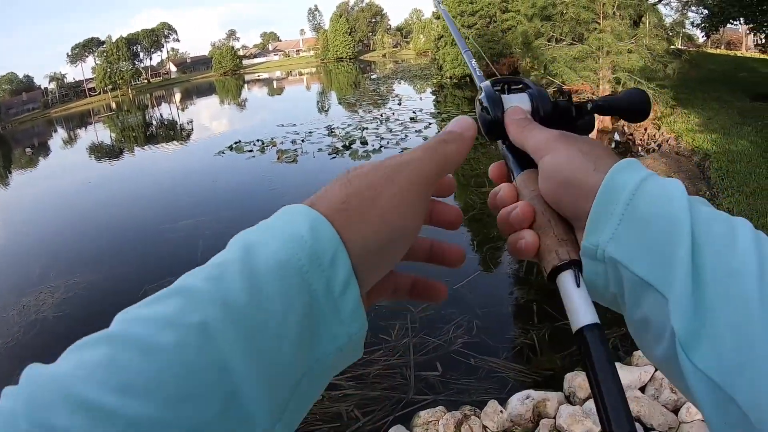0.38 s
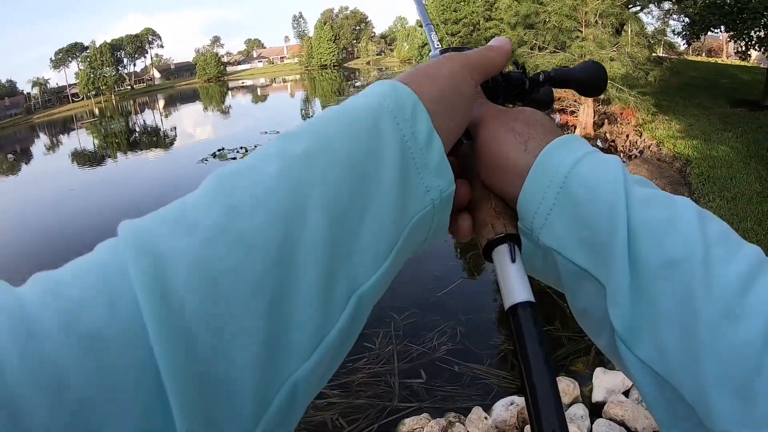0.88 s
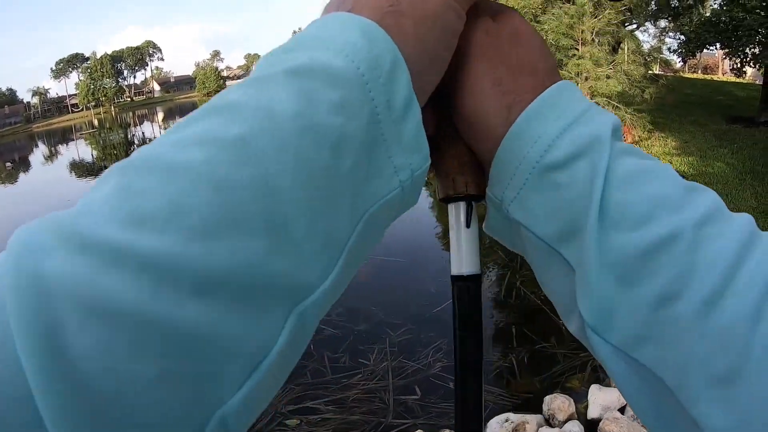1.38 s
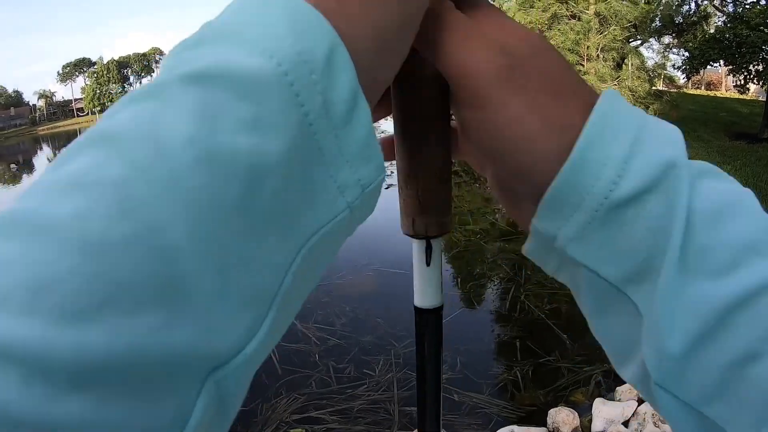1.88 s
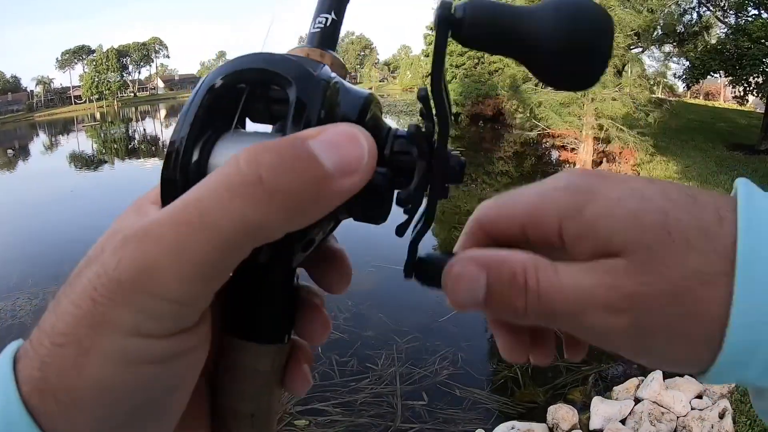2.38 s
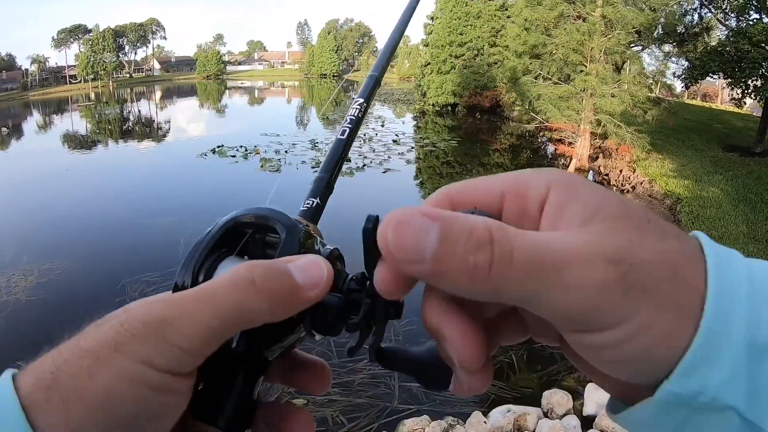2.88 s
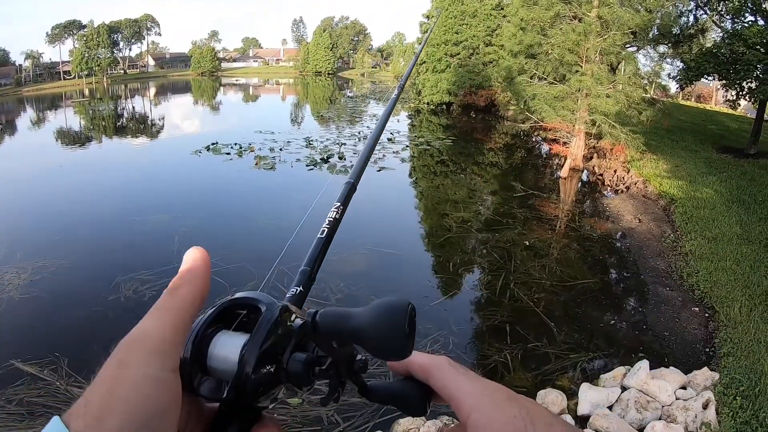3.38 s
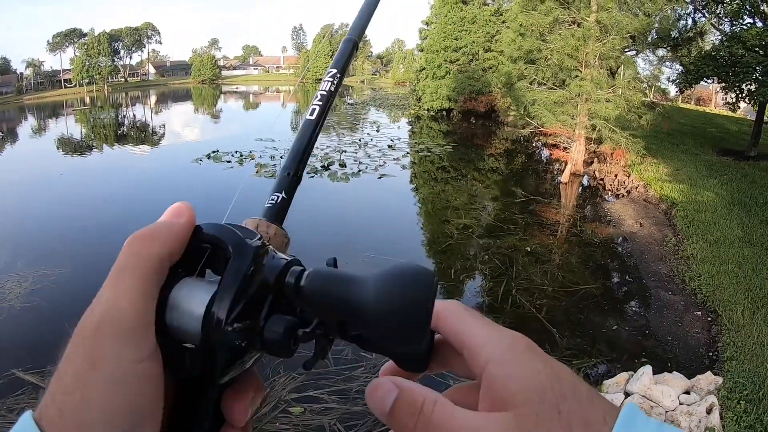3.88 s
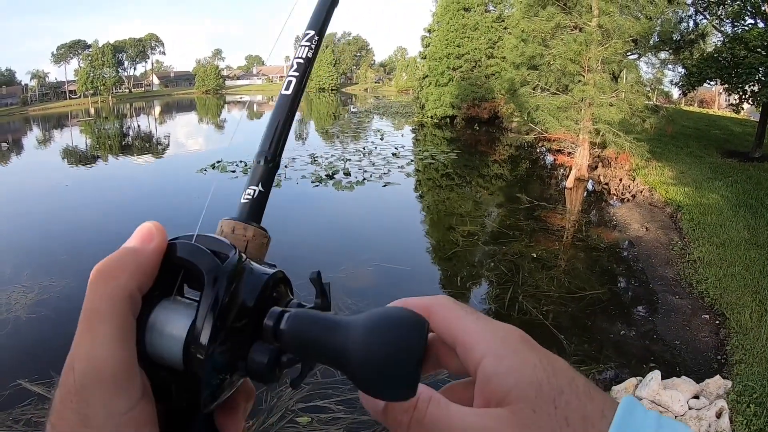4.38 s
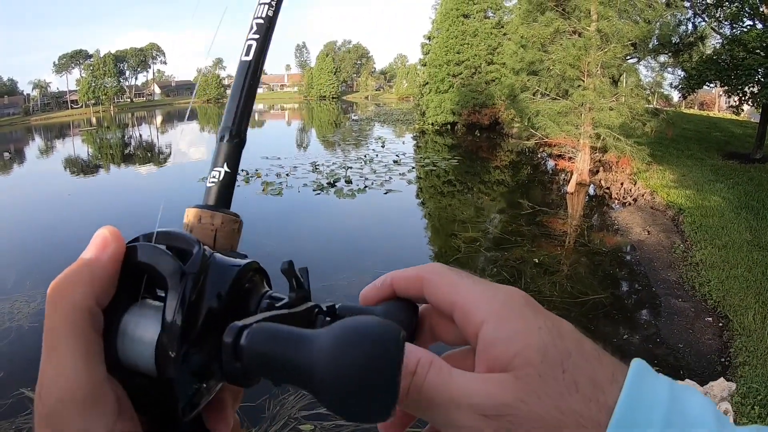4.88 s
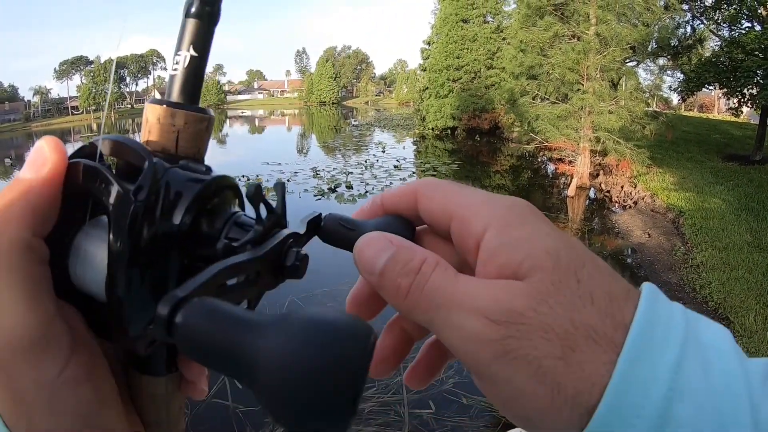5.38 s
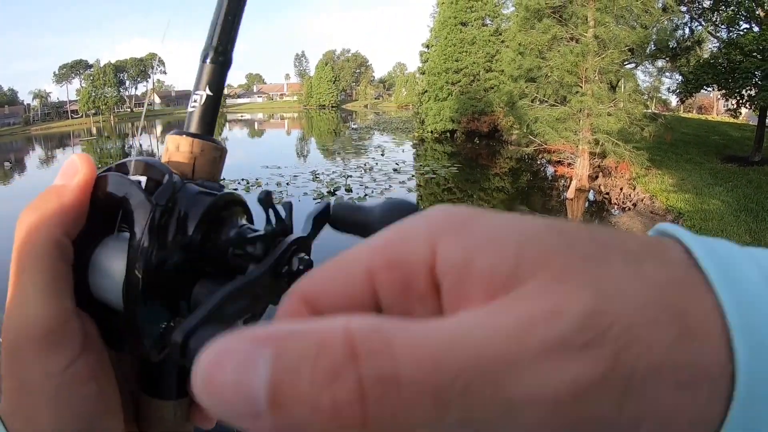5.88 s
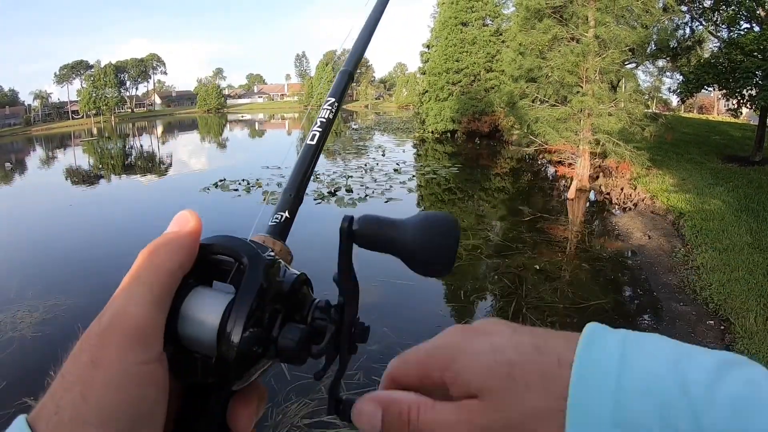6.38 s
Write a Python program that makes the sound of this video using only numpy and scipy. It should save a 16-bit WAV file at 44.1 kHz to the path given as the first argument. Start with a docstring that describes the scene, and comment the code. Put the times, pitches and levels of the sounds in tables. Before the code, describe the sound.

A quiet open-air pond bank, heard through a small stereo camera microphone close to the hands. Throughout, very high crickets chirp in an even pulse, about four a second, growing slightly clearer after 3 seconds, over steady hiss, faint breeze, far traffic and swelling deep rumble. At first reel gears whirr softly, with light ticks at 0.5-0.8 seconds. Hands rustle and rasp more from 1 second, with small ticks at 1.8. At 2.05-2.1 the clutch snaps back: a loud, hard double crack with a brief metallic rattle. A smaller click comes at 2.65, fainter ticks near 2.9 and 3.1. The whirr fades by 4; a faint far whistle sounds around 4.1-4.4. Soft finger touches cluster at 5.1-5.35, with a brief whirr. From 5.75 the gears return faintly, with ticks at 6.0, a tiny squeak at 6.14, more rustling and a last double tick at 6.36.

```python
"""Beside a pond, an angler winds and handles a small geared reel. Far traffic and a deep rumble (shaped noise)
lie under hiss and breeze; crickets, built from sine wing strokes, chirp about four times a second in the grass.
The gears whirr at first (noise in housing resonances), fade away and are heard again. The clutch snaps back;
ticks and soft touches (short noise pushes) ring the reel, hands rustle and rasp, and faint thin tones sound:
a far whistle and, late on, a short squeak (arched sines)."""
import sys
import numpy as np
from scipy import signal
from scipy.fft import rfft, irfft
from scipy.io import wavfile

SR = 44100
rng = np.random.default_rng(int(sys.argv[2]) if len(sys.argv) > 2 else 0)


def boost(x):
    """Linear amplitude factor 10**(x/20) for a level x in decibels (scalar or array-like)."""
    u = np.asarray(x, float) / 20
    return 10 ** u


def put_to_file(sound):
    """Save the sound as 16-bit audio at rate SR, in the file named by the first command-line argument."""
    columns = np.atleast_2d(sound).T  # one column per channel
    safe = np.clip(columns, -1, 1)
    whole_steps = np.round(safe * 32767)
    wavfile.write(sys.argv[1], SR, whole_steps.astype(np.int16))


N = 286694   # length in samples, 6.5 s


def rms_one(x):
    """Scale to rms 1."""
    return x / np.sqrt(np.mean(x ** 2) + 1e-20)


def at_hz(points, hz):
    """Read a spectrum on a log-frequency axis."""
    points = np.array(points)
    return np.interp(np.log(hz), np.log(points[:, 0]), points[:, 1])


def curve(rows):
    """Read a level curve at every sample."""
    return np.interp(np.arange(N) / SR, *np.transpose(rows))


def drift(rate_hz):
    """Slow random wander of rms about 1: noise through two equal one-pole low-passes at rate_hz."""
    step = 40   # worked out at every 40th sample, then joined by straight lines
    r = np.exp(-2 * np.pi * rate_hz * step / SR)
    slow = signal.lfilter([1], [1, -2 * r, r * r], rng.standard_normal(N // step + 2002))
    slow = rms_one(slow[2000:])   # leave out the filter's start
    return np.interp(np.arange(N) / step, np.arange(len(slow)), slow)


def ring(x, hz, t60_s):
    """Two-pole resonator: a unit click sets a sine of starting height 1 ringing, 60 dB down after t60_s."""
    r = boost(-60 / (t60_s * SR))
    w = 2 * np.pi * hz / SR
    return signal.lfilter([0, np.sin(w)], [1, -2 * r * np.cos(w), r * r], x + 1e-18)


def band(x, low_hz, high_hz):
    """Butterworth band-pass, 12 dB per octave on each side."""
    edges = [low_hz, min(high_hz, .45 * SR)]
    return signal.sosfilt(signal.butter(2, edges, "band", fs=SR, output="sos"), x)


def high_pass(x, order, hz):
    """Butterworth high-pass."""
    return signal.sosfilt(signal.butter(order, hz, "high", fs=SR, output="sos"), x)


def sides(x, pan_db):
    """Place a mono sound in stereo; pan_db is left minus right."""
    return x * boost(np.multiply.outer([.5, -.5], pan_db * np.ones(N)))


# Likeness of left and right in diffuse sound: f/Hz, correlation [-1 to 1]
LEFT_RIGHT_LIKENESS = [(40, .75), (70, .9), (130, .9), (290, .89), (640, .23), (1410, -.15), (3100, .27),
                       (6820, .22), (15000, -.2)]


def field(spectrum, patchy_db, rate_hz):
    """Diffuse stereo noise: coloured, alike in both ears by frequency, flickering per octave; mid rms 1."""
    hz = np.maximum(np.fft.rfftfreq(N, 1 / SR), 1)
    mid, side = rfft(rng.standard_normal((2, N))) * boost(at_hz(spectrum, hz))
    alike = np.clip(at_hz(LEFT_RIGHT_LIKENESS, hz), -.99, .99)
    ears = np.sqrt(1 + alike) * mid + np.sqrt(1 - alike) * side * [[1], [-1]]
    octave = np.log2(hz / spectrum[0][0])
    octaves = int(np.log2(spectrum[-1][0] / spectrum[0][0])) + 2
    out = 0
    for k in range(octaves):
        share = np.cos(np.pi / 2 * np.clip(octave - k, -1, 1)) ** 2   # neighbouring octaves crossfade
        out = out + irfft(ears * share, N) * boost(patchy_db * drift(rate_hz))
    return out / np.std(out.mean(axis=0))


# Colour of the deep rumble, shape only: f/Hz, level/dB [per Hz]
RUMBLE_COLOUR = [(40, -24), (62, -4.5), (85, -5.5), (108, -8), (140, -15)]
# Swells of the rumble: t/s, peak level/dB [before the wander], half length/s [down to 1/e]
RUMBLE_SWELLS = [(0, -56.5, 0.075), (0.674, -62, .12), (1.05, -73, 0.083), (1.97, -58, 0.13),
                 (2.264, -54.5, 0.094), (3.3, -61, 0.21), (4.136, -56.5, 0.19), (4.925, -56, 0.14),
                 (5.25, -53.5, 0.23), (5.848, -58.5, 0.21), (6.5, -63, .15)]


def rumble():
    """Deep far rumble: low noise in bell-shaped swells with a random wander in level."""
    t = np.arange(N) / SR
    swell = sum(boost(db) * np.exp(-((t - s) / half_s) ** 2) for s, db, half_s in RUMBLE_SWELLS)
    return swell * boost(3.84 * drift(8.0)) * field(RUMBLE_COLOUR, patchy_db=2.5, rate_hz=2.7)


# Colour of the traffic, shape only: f/Hz, level/dB [per Hz]
TRAFFIC_COLOUR = [(20, -43), (35, -16), (55, -12.5), (110, -4.5), (170, -0.5), (330, -5), (450, -10.5),
                  (800, -19), (1200, -55)]
# Level of the traffic: t/s, level/dB
TRAFFIC_CURVE = [(0, -52.5), (.83, -50.5), (1.4, -52.5), (1.96, -48.5), (2.3, -54.5), (3.5, -54.5),
                 (3.8, -53.5), (5.9, -53.5), (6.08, -50), (6.5, -54)]


def traffic():
    """Far traffic: broad low noise that follows a level curve."""
    return boost(curve(TRAFFIC_CURVE)) * field(TRAFFIC_COLOUR, patchy_db=.62, rate_hz=7.7)


# Colour of the hiss, shape only: f/Hz, level/dB [per Hz]
HISS_COLOUR = [(1500, -13), (2500, -14.5), (4200, -8), (6000, 2), (7600, 2.5), (9600, 1.5), (10400, -3),
               (11300, -16), (14200, -19), (15500, -43), (16300, -48)]
HISS_DB = -61


def hiss():
    """Steady hiss of leaves, far insects and microphone: high noise with a slight flicker."""
    return boost(HISS_DB) * field(HISS_COLOUR, patchy_db=.25, rate_hz=9.0)


# Colour of the breeze, shape only: f/Hz, level/dB [per Hz]
BREEZE_COLOUR = [(800, -43), (1100, 13), (1800, -1), (2600, 0), (4000, 5), (6000, -37)]
# Level of the breeze: t/s, level/dB
BREEZE_CURVE = [(0, -70.5), (.83, -68.5), (1.05, -77), (3.8, -76.5), (4.75, -76.5), (5.3, -74.5),
                (6.5, -69)]


def breeze():
    """Breeze: patchy noise above about 1 kHz that follows a level curve."""
    return boost(curve(BREEZE_CURVE)) * field(BREEZE_COLOUR, patchy_db=3.0, rate_hz=15.0)


# Faint thin tones, one a row: a far whistle, and at 6.14 s a short squeak:
# start t/s, length/s, top f/Hz, level/dB [rms before flicker and panning], fall over the tone/Hz
THIN_TONES = [(4.085, .035, 1165, -68, 0), (4.15, .07, 1765, -70, 0), (4.21, .125, 1750, -75, 0),
              (4.33, .075, 1860, -73, 150), (6.14, .06, 1600, -71, 0)]
TOP_AT = .4     # share of the tone where the level peaks and the arch is highest
ARCH_HZ = 300   # sag per squared share of the tone away from there


def thin_tones():
    """Far whistle and a short squeak: sines that arch in pitch, with soft ends and a small random wobble."""
    out, t = np.zeros(N), np.arange(N) / SR
    for s, length_s, top_hz, db, fall_hz in THIN_TONES:
        along = np.clip((t - s) / length_s, 0, 1)
        rise_or_fall = np.minimum(along / TOP_AT, (1 - along) / (1 - TOP_AT))
        swell = np.sin(np.pi / 2 * rise_or_fall) ** .5
        from_top = along - TOP_AT
        hz = top_hz - ARCH_HZ * from_top ** 2 - fall_hz * from_top + 20 * drift(40)
        out += np.sqrt(2) * boost(db) * swell * np.sin(2 * np.pi * np.cumsum(hz) / SR)
    return sides(out * boost(2 * drift(30.0)), pan_db=-11.0)


# Wing strokes of one chirp: place [strokes from the loudest], level/dB [against the chirp], f offset/Hz
WING_STROKES = [(-4, -12, -200), (-3, -7, -100), (-2, -4, -30), (-1, -2.5, 0), (0, -2, 10), (1, -5.5, 10)]
# Runs of evenly spaced chirps, and stray single chirps of a lower cricket:
# first t/s, last t/s, chirps [count], level/dB [stroke peak], wing f/Hz; all before the scatter below
CHIRPS = [(.165, 2.265, 10, -57, 6945), (2.515, 3.0, 3, -55.5, 6965), (3.245, 3.72, 3, -52.5, 6975),
          (3.965, 5.675, 8, -51.5, 6975), (5.9, 6.39, 3, -51.5, 6970), (.14, .68, 3, -61.5, 7220),
          (1.375, 1.83, 2, -61.5, 7225), (2.41, 2.92, 3, -60.5, 7230), (3.21, 5.02, 8, -59.5, 7250),
          (5.91, 6.2, 2, -59, 7245), (.43, 1.03, 2, -58.5, 6880), (1.91, 1.91, 1, -57, 6920),
          (5.04, 5.04, 1, -58, 6840)]
CHIRP_JITTER_S, CHIRP_SPREAD_DB, CHIRP_SPREAD_HZ = .005, .7, 12


def crickets(stroke_s=.0212, fill=1.4, rough=.55, echo_db=-8.0, echo_s=.04):
    """Each chirp is a swell of short wing strokes, rising in pitch, blurred by scatter in the grass."""
    out = np.zeros((2, N + SR))
    size = int(fill * stroke_s * SR)   # strokes overlap a little
    chirps = np.array([(s, db, hz) for first, last, count, db, hz in CHIRPS
                       for s in np.linspace(first, last, count)])
    chirps = chirps + rng.standard_normal(chirps.shape) * [CHIRP_JITTER_S, CHIRP_SPREAD_DB, CHIRP_SPREAD_HZ]
    luck = rng.standard_normal((len(chirps), len(WING_STROKES), 4))
    for (s, level_db, wing_hz), row in zip(chirps, luck):
        for (k, db, offset_hz), (late, loud, left, right) in zip(WING_STROKES, row):
            i = int((s + k * stroke_s + 0.0011 * late) * SR) - size // 2
            phase = 2 * np.pi * (wing_hz + offset_hz) * np.arange(i, i + size) / SR
            stroke = np.hanning(size) * np.sin(phase + .5 * np.array([[left], [right]]))
            out[:, i:i + size] += boost(level_db + db + loud) * stroke
    flutter = signal.lfilter([.06], [1, -.94], rng.standard_normal((2, N)))
    direct = out[:, :N] * (1 + rough * rms_one(flutter))
    # scattered echoes from bank and trees: a short dying noise
    t = np.arange(SR // 4) / SR
    scatter = rng.standard_normal((2, len(t))) * np.exp(-t / echo_s)
    scatter = scatter / np.sqrt((scatter ** 2).sum(axis=1, keepdims=True))
    return direct + boost(echo_db) * signal.fftconvolve(direct, scatter, axes=1)[:, :N]


# Colour of sleeves and grip, shape only: f/Hz, level/dB [per Hz]
RUSTLE_COLOUR = [(300, -20), (550, 2.5), (900, 1.5), (1600, -7.5), (2600, -6), (4500, -12), (8000, -23),
                 (14000, -66)]


def rustle(effort_db):
    """Rustle of sleeves and grip: patchy noise whose level is the effort of the hands."""
    return boost(effort_db) * field(RUSTLE_COLOUR, patchy_db=2.5, rate_hz=10.0)


# Two resonances rasped by dragging fingers: f/Hz, width/Hz, level/dB [effort and whirr at reference],
# slope on effort [dB per dB], slope on whirr [dB per dB]
RASP_BANDS = [(1626, 330, -70, 1.5, 0.6), (4450, 380, -69.5, 1.2, .6)]
REFERENCE_DB = -62   # reference for both effort and whirr


def rasp(effort_db, whirr_db):
    """Fingers drag on the reel: grainy friction noise, growing with effort and with the whirr of the gears."""
    out = 0
    for hz, width_hz, db, per_effort, per_whirr in RASP_BANDS:
        rub = rng.standard_normal((2, N))
        rub = (rub + 0.24 * rub[::-1]) * boost(1.8 * drift(9.0))   # each side leaks a little into the other
        level_db = db + per_effort * (effort_db - REFERENCE_DB) + per_whirr * (whirr_db - REFERENCE_DB)
        out = out + boost(level_db) * rms_one(band(rub, hz - width_hz / 2, hz + width_hz / 2))
    return out


# Gear housing resonances: f/Hz, spread/Hz [ring time t60 is 4.2 / spread], level/dB [relative]
HOUSING_MODES = [(2800, 790, -3), (3146, 140, -3), (3390, 350, 1.5), (3830, 1100, 3.5), (4960, 610, 2),
                 (5610, 1100, 5)]
THROB_PER_S, THROB_FIRST_S, THROB_DEPTH = 10.5, 0.027, 0.28


def gears(whirr_db):
    """Tooth noise in the housing resonances, throbbing once per turn of the pinion."""
    turn = 2 * np.pi * THROB_PER_S * (np.arange(N) / SR - THROB_FIRST_S)
    teeth = rng.standard_normal((2, N))
    teeth = (teeth + 0.12 * teeth[::-1]) * (1 + THROB_DEPTH * np.cos(turn))
    hum = sum(boost(db) * rms_one(ring(teeth, hz, 4.2 / spread_hz)) for hz, spread_hz, db in HOUSING_MODES)
    hum = high_pass(hum, 6, 2550)   # the small housing has no lower voice
    return rms_one(hum) * boost(whirr_db)


# Ticks and snaps of the reel: t/s, peak level/dB [before the last filters], centre f/Hz,
# knock level/dB, treble level/dB [both against the crack]
REEL_TICKS = [(0.5446, -34, 4300, 0.5, 3), (.598, -37.5, 4200, -20, 4), (0.6554, -38.5, 2770, -15, -2),
              (.699, -42, 2020, -16, -7), (0.7607, -39.5, 3020, -5, 4), (1.7744, -31, 11000, -27, 1),
              (1.788, -31.5, 3140, -12, -0.5), (2.0454, -8, 3700, -7.5, -19), (2.050, -20.5, 2210, 9, -18),
              (2.0722, -23, 4000, -15, -2), (2.074, -8, 3000, -32, -7), (2.076, -9.5, 2360, -26, 6),
              (2.0796, -13.5, 2350, -27, 1.5), (2.0838, -12.5, 3230, -2, -12), (2.0899, -20, 6400, 3, -10),
              (2.094, -27, 3400, 4, -15), (2.0975, -23, 6370, -10, -12), (2.0996, -25, 3160, 2, -11),
              (2.631, -40, 4500, -15, -12), (2.641, -35, 2400, -12, -10), (2.6495, -22.5, 3350, 1, -21),
              (2.652, -24, 3800, 1.5, 0), (2.6615, -39, 2800, -10, -12), (2.8956, -43, 3600, 3, -8),
              (3.143, -46, 2090, -10, -12), (6.0157, -36.5, 4460, -23, 2), (6.028, -31, 4900, -7, 1),
              (6.03, -40, 1570, -7, -20), (6.0366, -32, 3970, -4, -10), (6.3593, -34.5, 900, -7, 1),
              (6.3668, -32, 4500, -9, 2)]
# Soft slow touches of fingers on the reel: t/s, peak level/dB [before the last filters], centre f/Hz
FINGER_TOUCHES = [(.335, -47, 3600), (2.879, -46.5, 2300), (4.78, -60, 1980), (5.12, -52, 3500),
                  (5.215, -51, 3400), (5.235, -53, 2600), (5.25, -54, 3000), (5.283, -53.5, 1840),
                  (5.31, -56, 2300), (5.335, -54, 2870), (5.346, -61, 2700), (5.709, -53, 3500)]
# Modes of the reel body: f/Hz, level/dB [relative], t60/s
REEL_MODES = [(620, -30, 0.1), (820, -14, 0.04), (1000, -11.5, 0.071), (1566, -29, 0.037),
              (1553, -12, 0.11), (1832, -18, 0.09), (2040, -17, 0.065), (2328, -4.5, 0.061),
              (2754, -40, 0.026), (3430, -6, 0.014), (3690, 3.5, 0.012), (4000, 8.5, 0.0045),
              (5400, -2, 0.0072), (4220, -8, 0.02)]
TICK_CONTACT_MS, TOUCH_CONTACT_MS, TOUCH_KNOCK_DB, TOUCH_TREBLE_DB = 1.33, 7.0, -9, -13
THUMP_DB = -10.5   # low thump of the rod, against the knock


def ticks(ring_db=-4.5, apart=0.4, tail_db=-20.0, tail_s=0.0055):
    """Each contact is a broad crack with a low knock and a dying rattle; it also rings the modes of the reel."""
    out, size = np.zeros((2, N)), SR // 8
    contacts = [(*tick, TICK_CONTACT_MS) for tick in REEL_TICKS]
    contacts += [(*touch, TOUCH_KNOCK_DB, TOUCH_TREBLE_DB, TOUCH_CONTACT_MS) for touch in FINGER_TOUCHES]
    luck = rng.standard_normal((len(contacts), 3, size))
    t = np.arange(size) / SR
    for (s, peak_db, centre_hz, knock_db, treble_db, contact_ms), row in zip(contacts, luck):
        x = 1000 * t / contact_ms
        shape = x * np.exp(-x ** 2) + boost(tail_db) * np.exp(-t / tail_s)   # contact, then rattle
        push = (row[0] + apart * row[1:]) * shape   # shared noise plus some of each side's own
        low_hz, high_hz = centre_hz / 1.6, centre_hz * 1.26
        crack = rms_one(band(band(push, low_hz, high_hz), low_hz, high_hz))
        slow_push = push * np.exp(t / (2 * tail_s))   # the rattle dies half as fast in the knock
        knock = rms_one(band(slow_push, 1350, 2220))
        knock = knock + boost(THUMP_DB) * rms_one(band(slow_push, 400, 1100))
        treble = rms_one(band(row[1:] * shape, 5100, 8260))   # the treble differs at the two ports
        body = rms_one(sum(boost(db) * ring(push, hz, t60_s) for hz, db, t60_s in REEL_MODES))
        pair = crack + boost(knock_db) * knock + boost(treble_db) * treble + boost(ring_db) * body
        i = int(s * SR)
        out[:, i:i + size] += pair * boost(peak_db) / np.abs(pair.mean(axis=0)).max()
    out = high_pass(out, 2, 400)
    # the microphone port loses the top of these nearby sounds
    return signal.sosfilt(signal.butter(1, 9000, fs=SR, output="sos"), out)


# Effort of the hands: t/s, level/dB
HAND_EFFORT = [(0, -64.5), (.67, -69), (.85, -75), (1.05, -64), (1.27, -60.5), (1.59, -63), (1.75, -57),
               (1.96, -54.5), (2.13, -59), (2.26, -61), (2.53, -57.5), (2.84, -64), (3.4, -65),
               (3.8, -65.5), (5.72, -66), (5.9, -60.5), (6.08, -58.5), (6.5, -59)]
# The gears whirr, fade away and are heard again: t/s, level/dB
GEAR_WHIRR = [(0, -58), (1.5, -60), (2.5, -60.5), (2.8, -64.5), (3.76, -66), (4.2, -80), (5.0, -88),
              (5.34, -65), (5.56, -89), (5.76, -65.5), (6.08, -64), (6.5, -70)]


def scene():
    """Background layers on their curves, with crickets, hands and reel on top."""
    effort_db, whirr_db = curve(HAND_EFFORT), curve(GEAR_WHIRR)
    background = rumble() + traffic() + hiss() + breeze()
    hands = rustle(effort_db) + rasp(effort_db, whirr_db)
    return background + thin_tones() + crickets() + hands + gears(whirr_db) + ticks()


def roll_off(x):
    """The treble ends steeply here."""
    return signal.sosfilt(signal.butter(12, 16280, fs=SR, output="sos"), x)


# Colour difference of the two ports: f/Hz, level/dB [left minus right]
PORT_DIFFERENCE = [(60, -1), (400, -0.5), (700, -2.5), (1300, 1.5), (2300, 1.5), (4400, -0.5), (7000, -7),
                   (9000, 3.5), (14000, 7)]


def record(dry):
    """A small camera: its two ports differ in colour, and a steep low-pass ends the treble by 16.2 kHz."""
    hz = np.maximum(np.fft.rfftfreq(N, 1 / SR), 1)
    tilt_db = np.outer([.5, -.5], at_hz(PORT_DIFFERENCE, hz))
    ports = irfft(rfft(dry) * boost(tilt_db), N)
    mix = signal.sosfilt(signal.cheby2(10, 50, 16200, fs=SR, output="sos"), ports)
    return roll_off(mix)


dry = scene()
out = record(dry)
put_to_file(out)
```